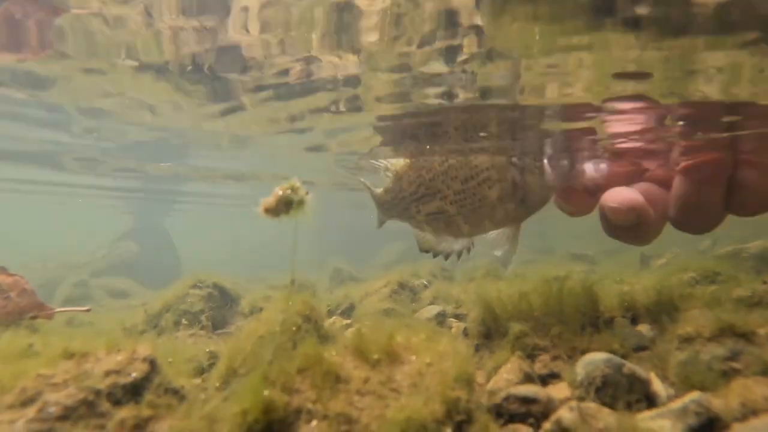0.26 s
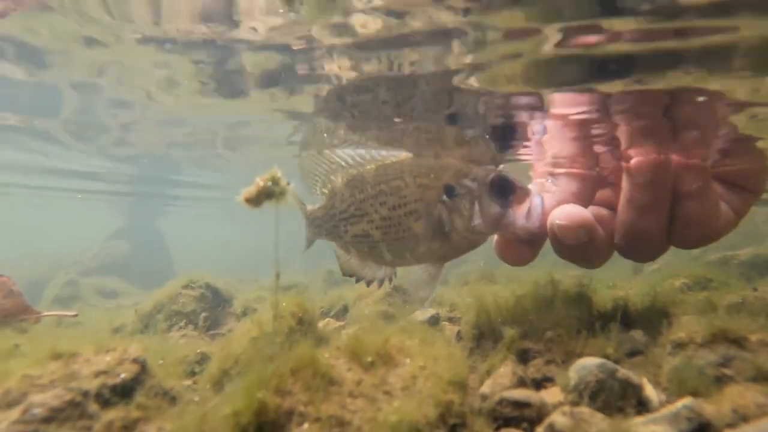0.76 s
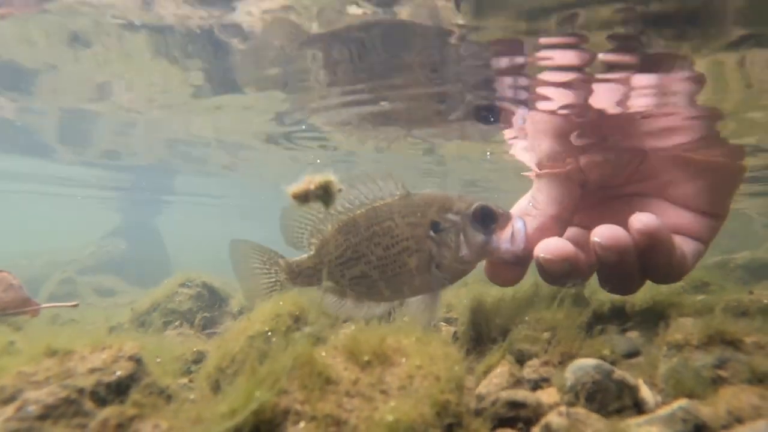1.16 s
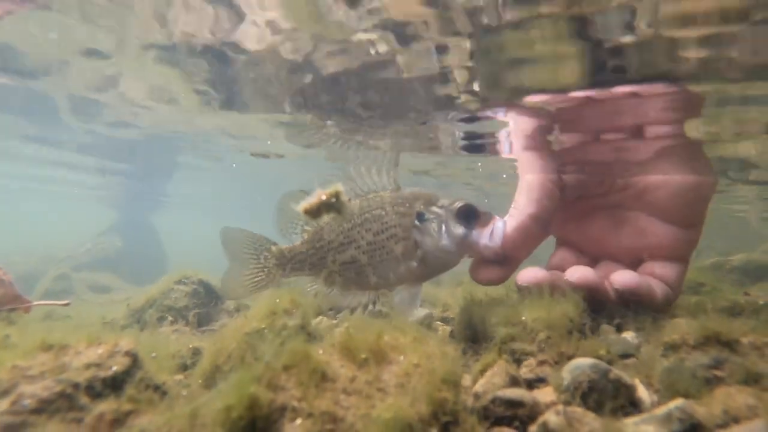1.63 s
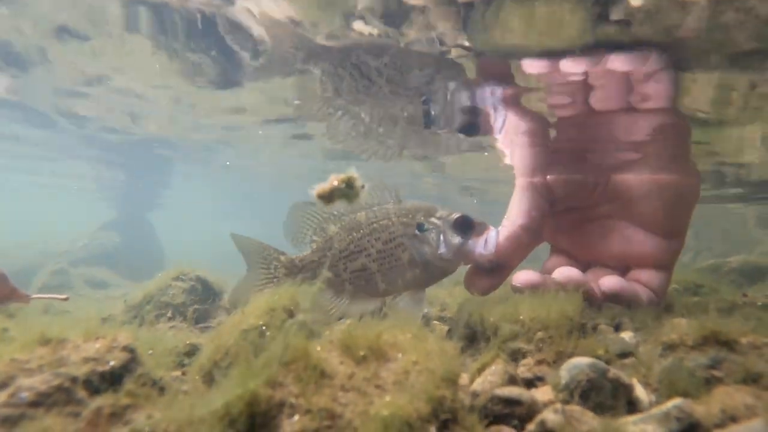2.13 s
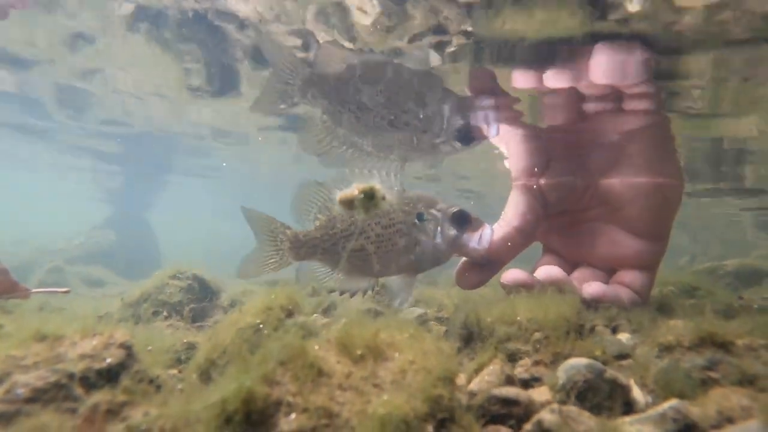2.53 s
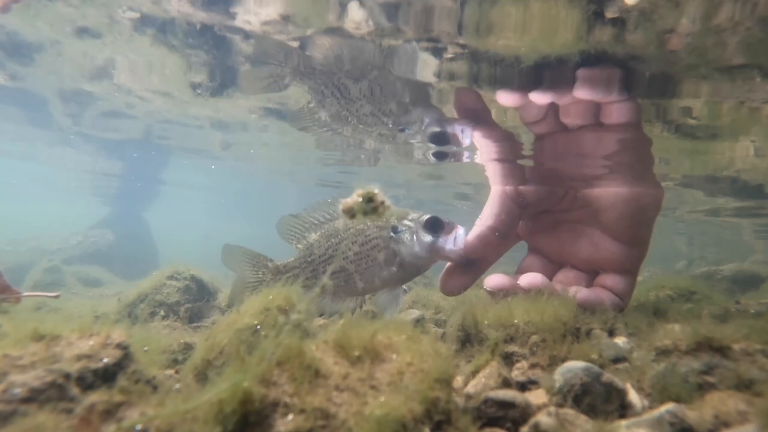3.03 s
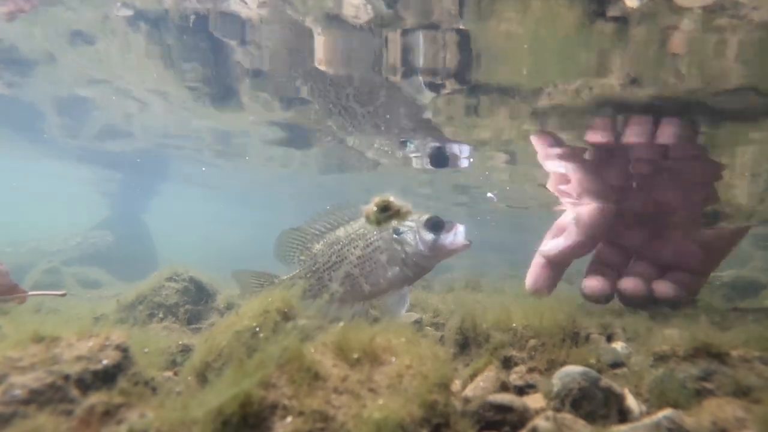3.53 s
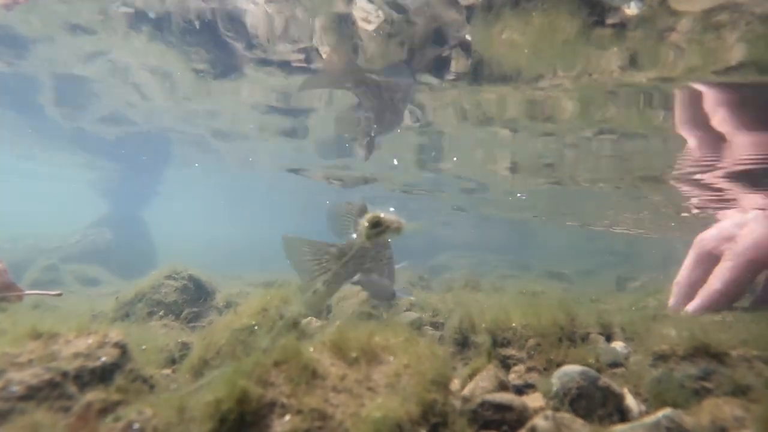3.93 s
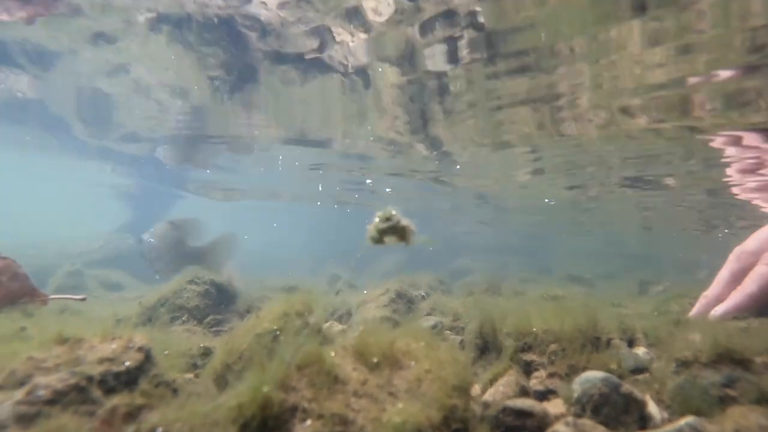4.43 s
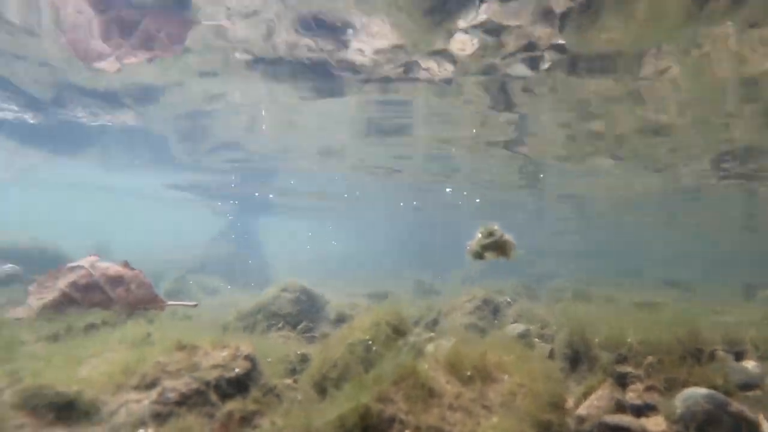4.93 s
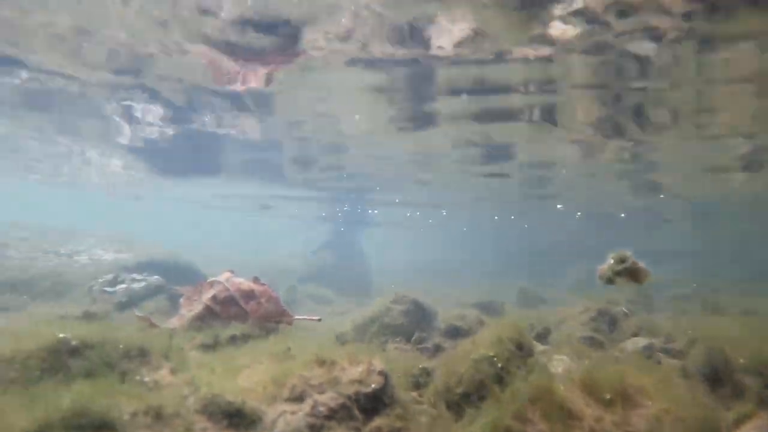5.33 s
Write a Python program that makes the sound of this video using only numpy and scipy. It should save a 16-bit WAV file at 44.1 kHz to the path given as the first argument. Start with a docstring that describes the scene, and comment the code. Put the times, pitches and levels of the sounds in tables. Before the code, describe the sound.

Heard from inside a sealed case under a shallow stream: deep, almost subsonic water rumble throughout. Light ticks and brief rubs come first, then longer scratchy slides. Hard hollow knocks cluster around two and a half seconds, followed by bubbly gulps and a low shove. After a sharp click near four seconds it calms to faint rubbing, small knocks and a soft creak.

```python
"""Knocks run through the wall of a small sealed camera case, held just under a shallow stream: falling sweeps.
The grip rubs on it (shaped noise grains over low jolts), and grit snaps (brief rings with a hiss).
A seam creaks and trapped air hisses (noise through resonances); bubbles ring as decaying sines.
Water heaves against the case as slow noise. Four times the recorder skips with a tick: a brief offset."""
import sys
import numpy as np
from scipy import signal
from scipy.fft import rfft, irfft, next_fast_len
from scipy.io import wavfile
from scipy.ndimage import uniform_filter1d, map_coordinates

SR = 44100
rng = np.random.default_rng(int(sys.argv[2]) if len(sys.argv) > 2 else 0)


def volts_from_decibels(level):
    """Turn decibel levels (scalar or array-like) into linear amplitude factors."""
    exponent = np.asarray(level, float) / 20
    return 10 ** exponent


def wrap_up_sound(samples):
    """Save the sound to the file named by the first command line argument, as 16-bit audio."""
    columns = np.atleast_2d(samples).T
    # keep every value between -1 and 1, then stretch to whole-number steps
    tamed = np.clip(columns, -1, 1)
    steps = np.round(tamed * 32767).astype(np.int16)
    wavfile.write(sys.argv[1], SR, steps)


N = 245637  # samples

# Transmission of the case wall: f/Hz, relative level/dB
WALL_RESPONSE = [(100, -33.5), (300, -10), (550, -1.5), (950, -13.5), (1400, -8.5), (1900, -8.5),
                 (2450, -19), (3000, -16), (3800, -23), (4800, -28.5), (6500, -41.5), (10000, -59),
                 (16000, -86)]


def unit(x):
    """Normalisation: scales a signal to an rms of 1."""
    return x / np.sqrt(np.mean(x ** 2) + 1e-20)


def curves(rows):
    """Linear interpolation: one value per sample for each column after the time."""
    s, *cols = np.transpose(rows)
    return [np.interp(np.arange(N) / SR, s, c) for c in cols]


def wobble(rate):
    """Band-limited randomness: a smooth curve through rate random knots a second."""
    knots = rng.standard_normal(int(N * rate / SR) + 4)
    return map_coordinates(knots, [np.arange(N) * rate / SR])


def filtered(x, response):
    """Linear filtering: the spectrum of x is multiplied by a response of frequency."""
    m = next_fast_len(N + SR)
    return irfft(rfft(x, m) * response(np.fft.rfftfreq(m, 1 / SR)), m)[:N]


def coloured(x, points):
    """Spectral shaping: x through (Hz, dB) points joined on a logarithmic frequency axis."""
    f, db = np.transpose(points)
    return filtered(x, lambda hz: volts_from_decibels(np.interp(np.log(hz + 1), np.log(f + 1), db)))


def steady(x, seconds):
    """Level compression: x is divided by its own running rms, with a floor."""
    power = np.abs(uniform_filter1d(x ** 2, round(seconds * SR)))
    return x / np.sqrt(power + 0.012 * np.mean(x ** 2))


def held(spans, rest_db, edge):
    """Gating: a gain holds each (start, end, dB) span, its edges softened over edge seconds."""
    gain = np.full(N, volts_from_decibels(rest_db))
    for start, end, db in spans:
        gain[round(start * SR):round(end * SR)] = volts_from_decibels(db)
    return uniform_filter1d(gain, round(edge * SR))


def ringing(x, modes, order):
    """Resonance: x through summed (Hz, width, dB) modes, order times; more passes darken the valleys."""
    def mode_sum(f):
        return sum(volts_from_decibels(db / order) * 1j * f * w / (c * c - f * f + 1j * f * w) for c, w, db in modes)
    return unit(filtered(x, lambda f: mode_sum(f) ** order))


def patchy(x, depth_db):
    """Granular colour: random gain in short patches of the spectrum varies the timbre of the grains."""
    z = signal.stft(x, nperseg=256)[2]
    field = uniform_filter1d(rng.standard_normal(z.shape), size=5, axis=0)
    field = uniform_filter1d(field, size=2, axis=1)
    return signal.istft(z * volts_from_decibels(depth_db * unit(field)), nperseg=256)[1][:N]


def heave():
    """Hydrodynamic pressure: slow drift and quicker lapping of the water, felt more than heard."""
    # Water pressure on the case: t/s, level/dB (before the trim below)
    pressure_level = [(0.03, -18.5), (0.81, -18.5), (2.65, -19), (2.78, -29.5), (3.18, -20.5), (4.1, -24.5),
                      (4.11, -18.5), (5.18, -16), (5.21, -21), (5.54, -15)]
    # Spectrum of the swings: f/Hz, relative level/dB
    swell_spectrum = [(1.5, -26), (8, 6.5), (14, -4.5), (25, 0), (40, -11), (60, -16), (100, -36),
                      (200, -120)]
    drift_hz, drift_db = 16.3, 0.5  # upper limit of the drift, its level over the lapping
    level_db, = curves(pressure_level)
    swell = coloured(rng.standard_normal(N), swell_spectrum)
    drift = filtered(swell, lambda hz: 1 / (1 + (hz / drift_hz) ** 6))
    lapping = steady(swell - drift, 0.27)
    return volts_from_decibels(level_db - 3.5) * (volts_from_decibels(drift_db) * unit(drift) + lapping)


def bubbles():
    """Volume oscillation: bubbles start softly, ring and decay, rising a little in pitch."""
    # Bubbles: t/s, starting f/Hz, level/dB, time to decay by 60 dB/s
    bubble_rows = [(0.124, 1333, -31.5, 0.029), (2.8, 129, -20, 0.11), (3.146, 388, -17, 0.09),
                   (3.195, 199.5, -11.5, 0.13), (4.116, 201, -10.5, 0.036)]
    out = np.zeros(N)
    for s, hz, db, t60 in bubble_rows_in_order(bubble_rows):
        t = np.clip(np.arange(N) / SR - s, 0, None)
        envelope = volts_from_decibels(db - 60 * t / t60) * (1 - np.exp(-t * hz / 2))
        out += envelope * np.sin(2 * np.pi * hz * t * (1 + 0.2 * t))
    return out


def gulp():
    """Turbulent flow: air trapped under the hand squeezes out with a fluttering, resonant hiss."""
    # Shifts of air: start t/s, end t/s, level/dB, f/Hz, resonance width/Hz
    air_shifts = [(2.713, 2.822, -58, 2150, 260), (3.119, 3.172, -44, 1623, 559),
                  (3.122, 3.197, -51.5, 2027, 270)]
    out = np.zeros(N)
    for start, end, db, hz, width_hz in air_shifts:
        gain = held([(start, end, db)], rest_db=-120, edge=0.006)
        hiss = ringing(rng.standard_normal(N), [(hz, width_hz, 0)], order=3)
        out += gain * steady(hiss, 0.023) * volts_from_decibels(3 * wobble(60))
    return out


def creak():
    """Stick-slip friction: a seam gives in small jerks and groans under load, exciting its resonances."""
    # Jerks: t/s, level/dB
    jerks = [(4.766, -47), (4.803, -50.5), (4.848, -46.5), (4.893, -45.5), (4.985, -49), (5.017, -52.5),
             (5.04, -57), (5.18, -56), (5.254, -53), (5.302, -59), (5.337, -50.5), (5.482, -52),
             (5.53, -60)]
    # Steady groan: start t/s, end t/s, level/dB
    groans = [(4.47, 5.1, -57)]
    # Resonances of the seam: f/Hz, width/Hz, relative level/dB
    seam_modes = [(800, 340, 10.5), (1700, 620, -6), (2740, 500, -12)]
    jerk_s = 0.0074  # standard deviation of a bell-shaped jerk
    t = np.arange(N) / SR
    gain = held(groans, rest_db=-120, edge=0.19)
    for s, db in jerks:
        gain = gain + volts_from_decibels(db) * np.exp(-((t - s) / jerk_s) ** 2 / 2)
    return gain * ringing(rng.standard_normal(N), seam_modes, order=2)


def rubbing():
    """Friction follows motion: the gain of the rub is faint at rest and held high through each slide."""
    # Resting hand: t/s, level/dB
    rest_level = [(0, -62), (.1, -71), (.22, -61.5), (.58, -60.5), (.7, -72.5), (1.0, -67.5), (1.22, -60.5),
                  (1.36, -68), (1.55, -56.5), (1.94, -66), (2.2, -54), (2.5, -56.5), (2.82, -66),
                  (2.92, -72), (3.0, -61.5), (3.2, -56), (3.9, -65.5), (4.26, -64), (4.32, -57),
                  (4.36, -67.5), (4.47, -58), (4.7, -60), (4.87, -56), (5.03, -60), (5.2, -63), (5.57, -59)]
    # Slides of the hand: start t/s, end t/s, level/dB
    slide_spans = [(.303, .343, -49), (.35, .39, -52.5), (.828, .856, -52), (.856, .901, -40.5),
                   (.895, .992, -43), (1.133, 1.19, -48.5), (1.434, 1.466, -49), (1.507, 1.579, -49),
                   (1.592, 1.619, -43.5), (1.636, 1.691, -41.5), (1.709, 1.832, -41.5), (1.854, 1.889, -49),
                   (1.969, 1.997, -41), (2.005, 2.039, -41.5), (2.052, 2.139, -46), (2.284, 2.347, -43.5),
                   (2.379, 2.421, -40.5), (2.429, 2.531, -45), (2.582, 2.706, -35), (2.715, 2.735, -42.5),
                   (2.792, 2.808, -47.5), (2.837, 2.877, -51), (3.243, 3.292, -46.5), (3.312, 3.368, -47),
                   (3.388, 3.463, -42.5), (3.522, 3.565, -46.5), (3.559, 3.602, -45), (3.724, 3.806, -57.5),
                   (5.325, 5.36, -50.5)]
    return held(slide_spans, rest_db=curves(rest_level)[0], edge=0.016)


def grip():
    """Sliding friction: skin slips in uneven grains; each shift of the hand also jolts the whole body."""
    # Spectrum of a jolt: f/Hz, relative level/dB
    jolt_spectrum = [(30, -29), (60, 1.5), (120, -6), (220, -13.5), (350, -19.5), (550, -35.5),
                     (1200, -120)]
    # Shoves of the whole case: start t/s, end t/s, level/dB
    shove_spans = [(.306, .394, -29.5), (3.121, 3.24, -19.5), (4.42, 4.52, -29), (4.681, 4.727, -21.5),
                   (5.52, 5.57, -31.5)]
    firm_db = -45.5  # gain of a firm rub
    jolt_db, jolt_grows = -33, 0.65  # jolt gain at a firm rub, dB of jolt per dB of rub
    fidget_db, fidget_per_s = 3.2, 40  # unevenness of a light rub, its knots per second

    clumps = volts_from_decibels(2.28 * wobble(60))  # slips come in bunches
    sizes = volts_from_decibels(np.minimum(4 * rng.exponential(size=N), 15)) * rng.standard_normal(N)
    slips = (rng.random(N) < 1500 / SR) * sizes  # 1500 a second on average
    grains = patchy(unit(slips) + 0.5 * rng.standard_normal(N), depth_db=4.0)
    rub = unit(coloured(clumps * grains, WALL_RESPONSE))
    pricks = (rng.random(N) < 70 / SR) * rng.standard_normal(N)  # lone slips under a light touch
    wash = patchy(rng.standard_normal(N), depth_db=3.5) + 0.8 * unit(pricks)
    wash = unit(coloured(wash, WALL_RESPONSE))

    rub_gain = rubbing()
    lightness = np.clip(1 - rub_gain / volts_from_decibels(firm_db), 0, 1)
    rub_gain = rub_gain * volts_from_decibels(fidget_db * wobble(fidget_per_s) * lightness)
    hard = np.clip(rub_gain / volts_from_decibels(firm_db - 5), 0, 1) ** 2  # a light touch mostly washes
    rub = np.sqrt(hard) * rub + np.sqrt(1 - hard) * wash

    jolt = steady(coloured(clumps ** 0.5 * rng.standard_normal(N), jolt_spectrum), 0.043)
    soft = filtered(jolt, lambda hz: 1 / (1 + (hz / 140) ** 4))
    upper = jolt - soft
    jolt_gain = volts_from_decibels(jolt_db) * (rub_gain / volts_from_decibels(firm_db)) ** jolt_grows
    firm = np.clip(rub_gain / volts_from_decibels(firm_db), 0, 1) ** 0.2  # a lighter rub passes on less of the upper part
    shove_gain = held(shove_spans, rest_db=-120, edge=0.0065)
    shove = shove_gain * (soft + 0.22 * upper)  # mostly the low part
    return rub_gain * rub + jolt_gain * (soft + firm * upper) + shove


def snaps():
    """Random point process: 80 small ticks as rows, denser and louder where the hand rubs harder."""
    count, over_rub_db, mean_hz = 80, 0.5, 2100  # mean level over the rubbing, middle pitch
    rub_gain = rubbing()
    share = np.cumsum(rub_gain)
    at = np.searchsorted(share, rng.random(count) * share[-1])
    size, pitch = rng.standard_normal((count, 2)).T
    level_db = 20 * np.log10(rub_gain[at]) + over_rub_db + 2 * size
    return list(zip(at / SR, level_db, mean_hz * np.exp(pitch / 3)))


def ticks():
    """Impulsive excitation: grit snaps on the case, a few quick swings with a short hiss."""
    # Larger snaps: t/s, approximate ring peak level/dB, f/Hz
    grit_snaps = [(0.0372, -43, 1600), (0.0466, -46, 2800), (0.3535, -34.5, 2700), (0.379, -35.5, 2900),
                  (.4633, -48.5, 2200), (0.5576, -45.5, 1620), (0.613, -39.5, 1900), (0.663, -47, 2100),
                  (1.059, -45.5, 1400), (1.5653, -32.5, 1550), (1.7762, -29.5, 1590), (1.8794, -38, 1710),
                  (1.917, -40, 1440), (2.0138, -31.5, 1400), (2.3142, -33, 1990), (2.634, -29, 1700),
                  (3.044, -46.5, 2200), (3.066, -44, 2200), (3.794, -46.5, 3600), (3.8263, -43.5, 2200),
                  (3.862, -46.5, 2600), (4.0322, -46.5, 2400), (4.109, -27, 1850), (4.118, -26.5, 1660),
                  (4.21, -48, 3200), (4.3009, -41, 3080), (5.155, -43, 1700)]
    ring_cycles = 6.2  # cycles in which the exponential decay reaches -60 dB
    fizz_db, fizz_s = 0, 0.012  # hiss level relative to the snap, time to decay by 60 dB
    out, t = np.zeros(N + SR), np.arange(SR // 50) / SR
    fizz = unit(coloured(rng.standard_normal(N), WALL_RESPONSE[3:]))  # level below 950 Hz
    fizz_envelope = np.clip(t / 0.0015, 0, 1) * volts_from_decibels(fizz_db - 60 * t / fizz_s)
    for s, db, hz in [*grit_snaps, *snaps()]:
        at = round(s * SR)
        cycles = t * hz
        ring = -np.sin(2 * np.pi * cycles) * cycles * volts_from_decibels(10.5 - 60 * cycles / ring_cycles)
        hiss = fizz[at:at + len(t)] if at + len(t) < N else 0
        out[at:at + len(t)] += volts_from_decibels(db) * (ring + hiss * fizz_envelope)
    return out[:N]


def taps():
    """Random point process: 25 small knocks as rows, louder where the hand rubs harder."""
    # Mean of: level over the rubbing/dB, thump/dB, crack/dB
    tap_mean = (12, -7.5, -17.5)
    # Standard deviation of the same three columns/dB
    tap_spread = (2.5, 4, 4)
    count = 25
    s = rng.random(count) * (N - 1) / SR
    rows = np.add(tap_mean, np.multiply(tap_spread, rng.standard_normal((count, 3))))
    rows[:, 0] += 20 * np.log10(rubbing()[(s * SR).astype(int)])
    return [(at, *row) for at, row in zip(s, rows)]


def knocks():
    """Dispersion of bending waves in the wall: a sharp spike first, ever slower swings after it."""
    # Knocks: t/s, level/dB, then relative to it and before fixed offsets: thump/dB, crack/dB
    knock_rows = [(0.071, -47.5, -17, -1.5), (0.121, -40.5, -14.5, -18), (0.207, -48, -19, -6.5),
                  (0.258, -28, -32.5, -38), (0.355, -50.5, -5, -3), (0.452, -36, -18.5, -18.5),
                  (0.377, -24, -17, -31), (0.422, -35, -8.5, -22), (0.626, -42.5, 2.5, -28),
                  (0.898, -20, -17.5, -24), (0.971, -16.5, -26, -24.5), (1.213, -31.5, -15.5, -16.5),
                  (1.599, -30.5, -8.5, -14), (1.765, -28.5, -14, -11.5), (1.807, -13.5, -41, -35),
                  (1.971, -20, -17, -15), (2.407, -4.5, -15.5, -31), (2.591, -13.5, -12.5, -37),
                  (2.666, -10, -12.5, -24), (2.684, -21, -5, -10.5), (2.703, -7.5, -5.5, -24),
                  (2.768, -42, 20, -43), (2.776, -11, -11.5, -33), (2.839, -37, -14, -2),
                  (2.863, -32, -8.5, -4.5), (3.133, -27, -0.5, -31), (3.138, -18.5, 2, -28),
                  (3.19, -29.5, 14, -64), (3.253, -37, 3.5, -51), (3.273, -37.5, -0.5, -3.5),
                  (3.349, -42.5, 4.5, -9), (3.529, -31, 8, 1.5), (3.543, -29.5, -5, 5),
                  (3.547, -34.5, 9, -11), (3.839, -36, 0, -21), (4.108, -30, -3.5, -23),
                  (4.117, -32.5, 5, -23), (4.153, -42, -3, -12), (4.383, -52, 14, -19),
                  (4.486, -44.5, 15, -39), (4.577, -47.5, 6.5, -29), (4.635, -38, -17, -4.5),
                  (4.894, -24.5, -23, -20), (5.254, -55, 19.5, -19)]
    body, cracks, t = np.zeros(N + SR), np.zeros(N + SR), np.arange(SR // 20) / SR
    late = np.clip(t - 0.0015, 0, None)  # the spike follows the first touch
    burst = np.clip(t / 0.0015, 0, 1) ** 2 * volts_from_decibels(-60 * late / 0.014)
    for s, db, thump_db, crack_db in [*knock_rows, *taps()]:
        at = round(s * SR)
        contact = 0.00062 * volts_from_decibels(0.36 * thump_db)  # s; a blow with more thump lasts longer, starts lower
        sweep = np.sin(4 * np.log(1 + late / contact)) * (1 - np.exp(-late / (0.25 * contact)))
        spike = 1.2 * volts_from_decibels(-60 * late / 0.0015)
        thump = volts_from_decibels(thump_db + 9.0 - 60 * late / 0.11)
        body[at:at + len(t)] += volts_from_decibels(db) * sweep * (spike + thump)
        cracks[at:at + len(t)] += volts_from_decibels(db + crack_db + 8.5) * burst * rng.standard_normal(len(t))

    def body_response(hz):  # little treble, no slow push
        return (1j * hz / (40 + 1j * hz)) ** 2 / (1 + (hz / 2100) ** 8)

    def crack_response(hz):  # a band between about 1300 and 4000 Hz
        return 1 / (1 + (1300 / (hz + 1)) ** 4) / (1 + (hz / 4000) ** 6)

    return filtered(body[:N], body_response) + filtered(cracks[:N], crack_response)


def scene():
    """Superposition: everything reaches the one microphone through the case."""
    return (heave() + bubbles() + gulp() + creak() + grip() + ticks() + knocks())[None]


def top_cut(x):
    """Nothing passes above the cut-off."""
    return signal.sosfilt(signal.butter(12, 15780, fs=SR, output="sos"), x)


def record(dry):
    """Step discontinuity: at each skip the signal jumps by an offset, which holds and slides back."""
    # Skips: t/s, jump of the signal (full scale = 1)
    skip_rows = [(.7452, -.03), (2.7452, .075), (3.7452, -.19), (4.7452, -.012)]
    t = np.arange(N) / SR
    skips = np.zeros(N)
    for s, jump in skip_rows:
        slide_back = np.clip((s + 0.0045 - t) / 0.002, 0, 1)  # held 2.5 ms, gone 2 ms later
        skips += jump * (t >= s) * slide_back
    return top_cut(dry + skips)


def bubble_rows_in_order(rows):
    """Passes the bubble rows on as they stand."""
    return rows


dry = scene()
out = record(dry)
wrap_up_sound(out)
```